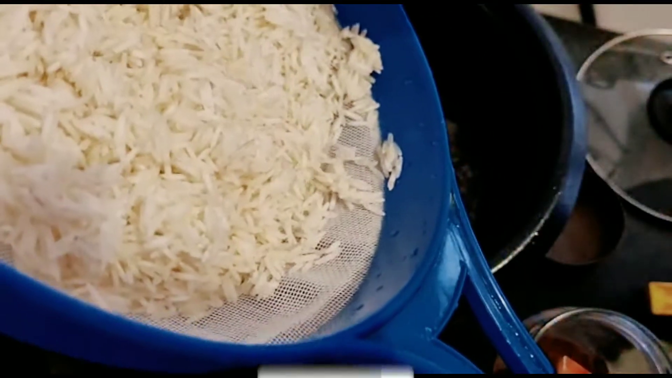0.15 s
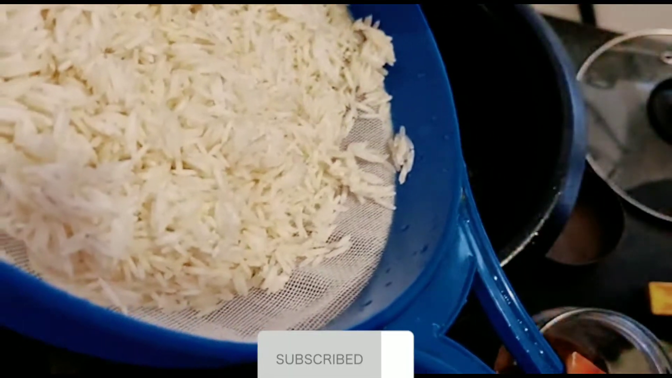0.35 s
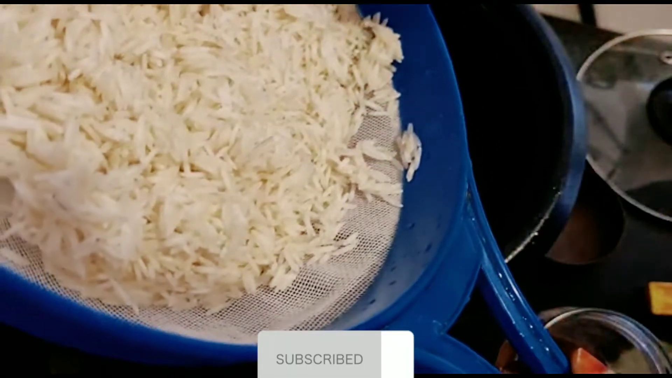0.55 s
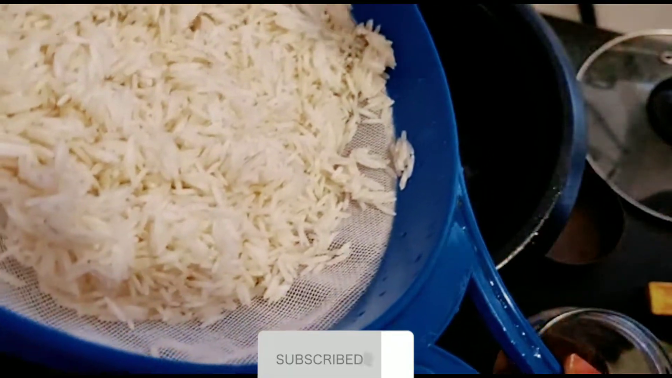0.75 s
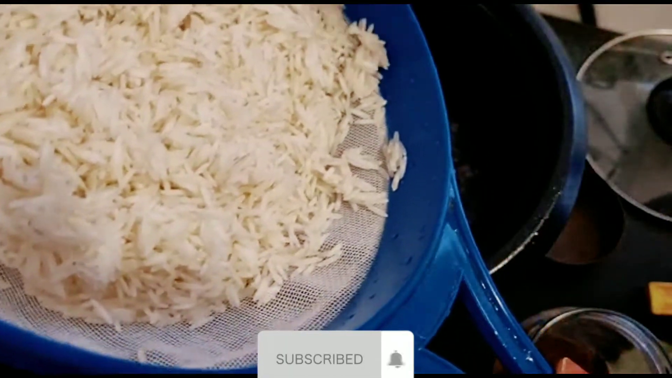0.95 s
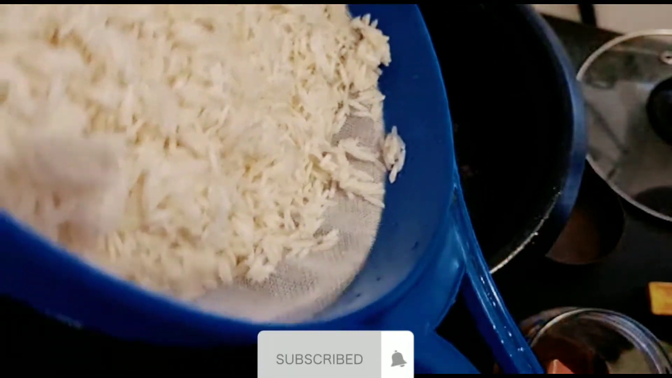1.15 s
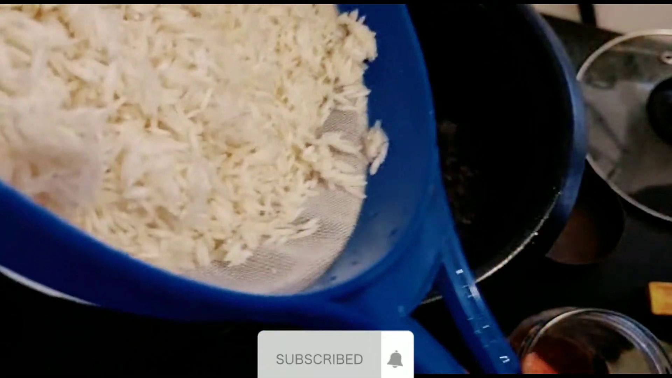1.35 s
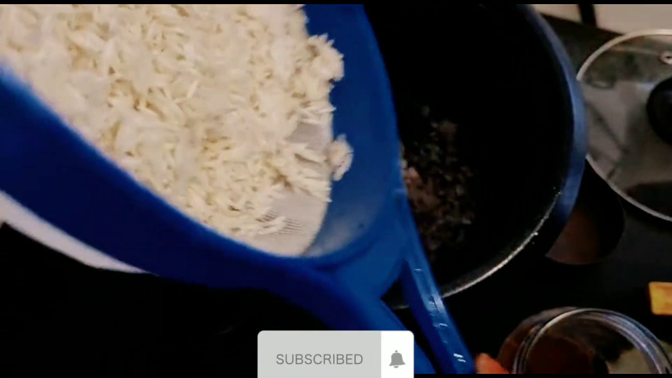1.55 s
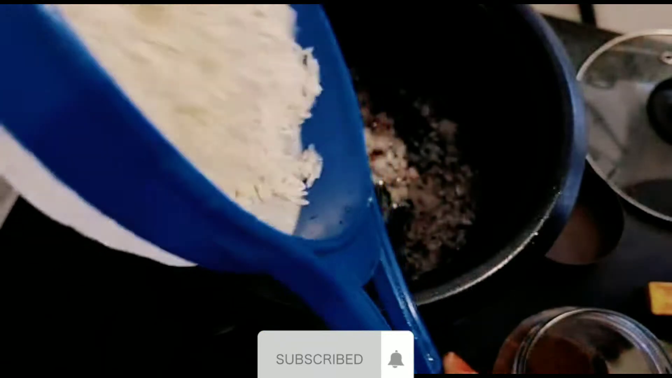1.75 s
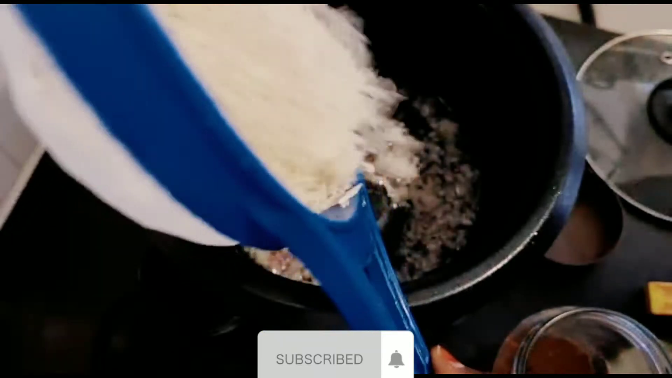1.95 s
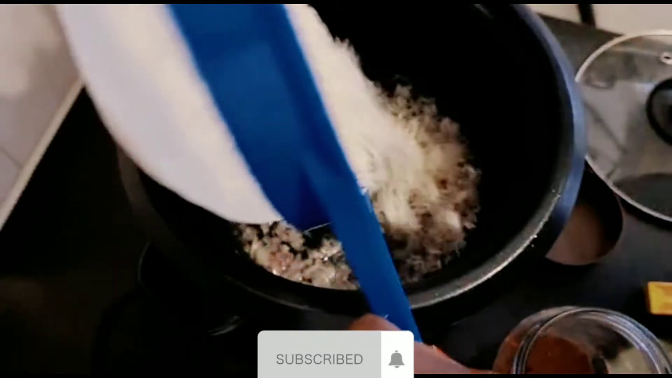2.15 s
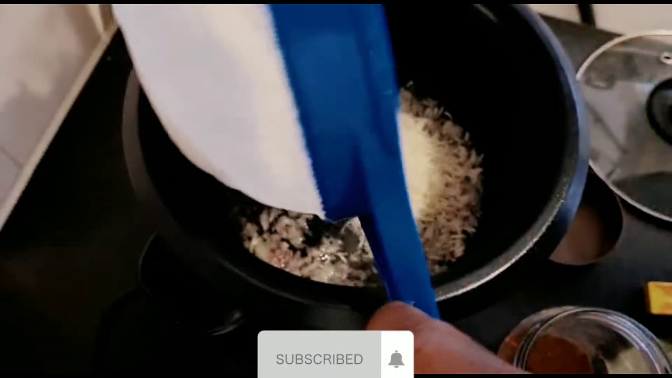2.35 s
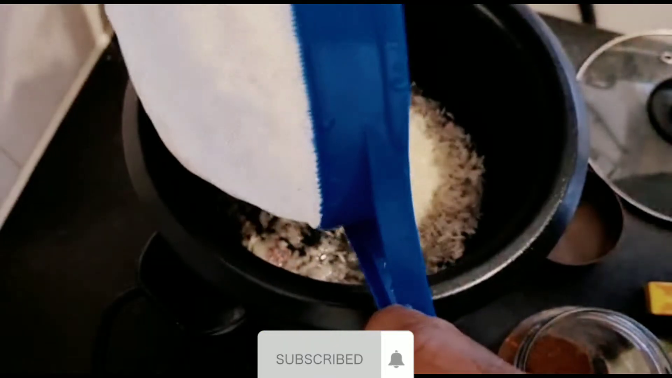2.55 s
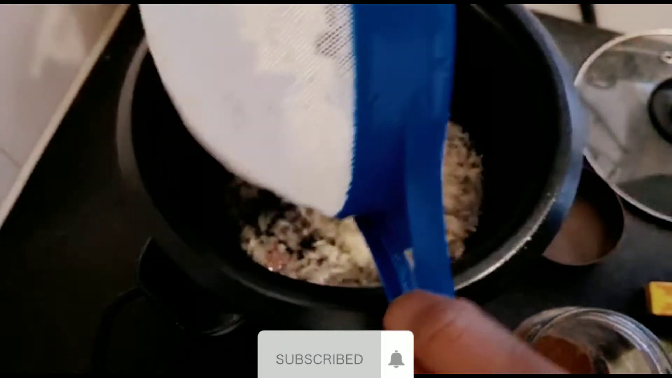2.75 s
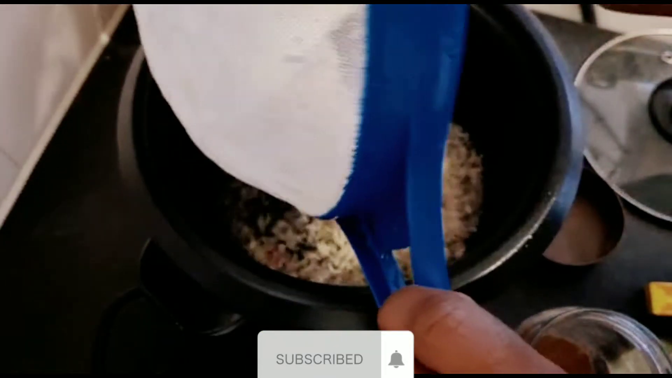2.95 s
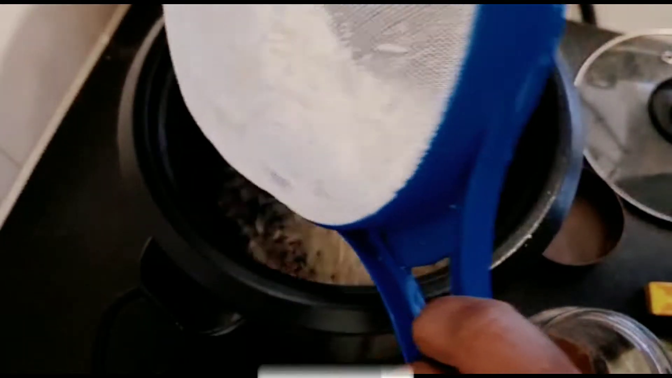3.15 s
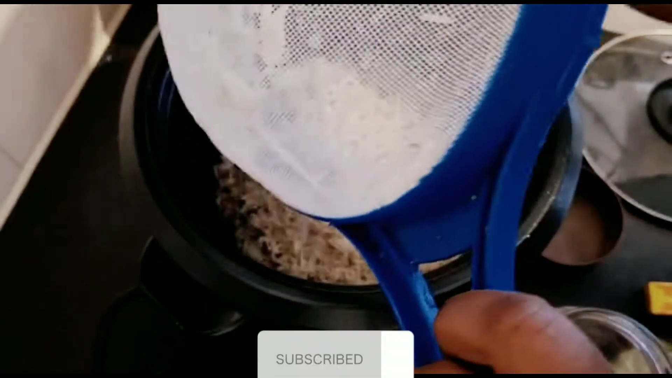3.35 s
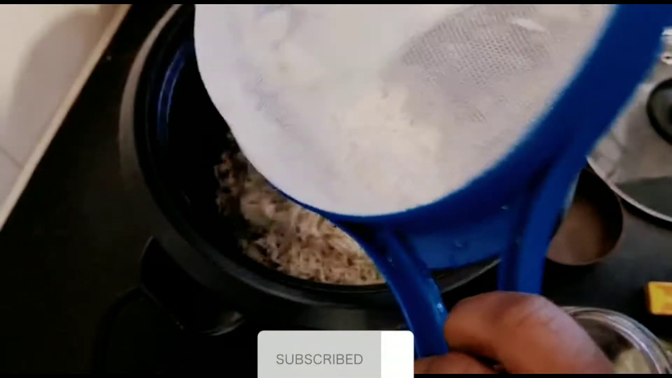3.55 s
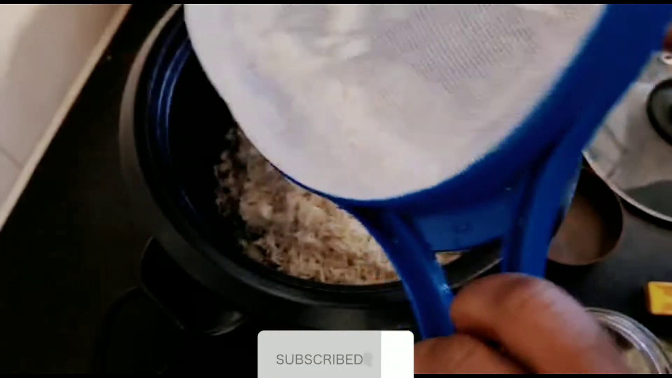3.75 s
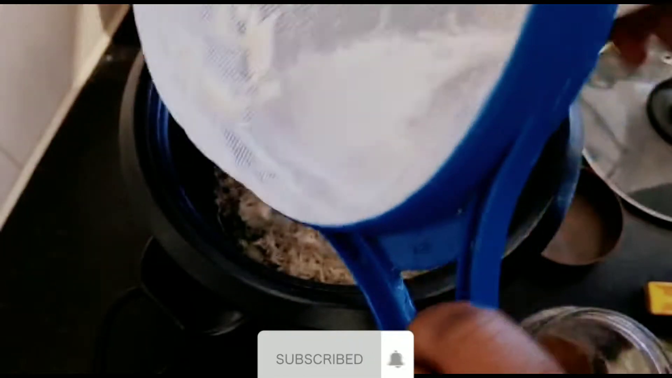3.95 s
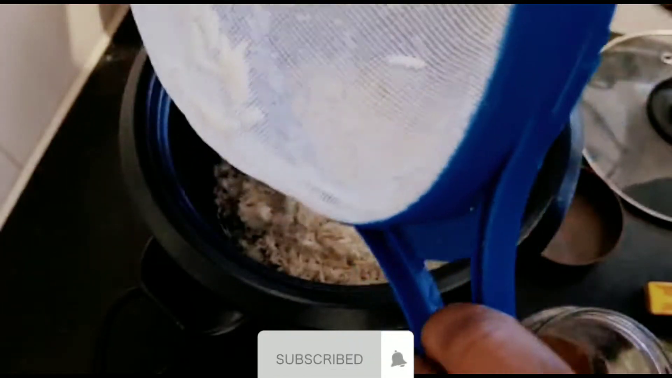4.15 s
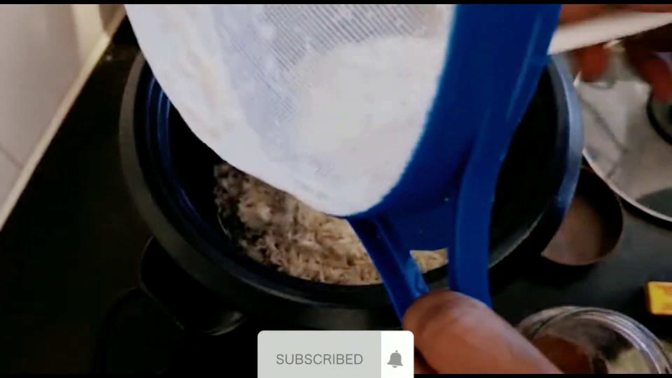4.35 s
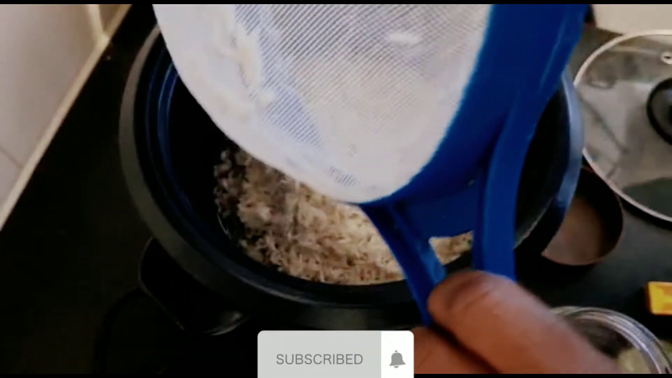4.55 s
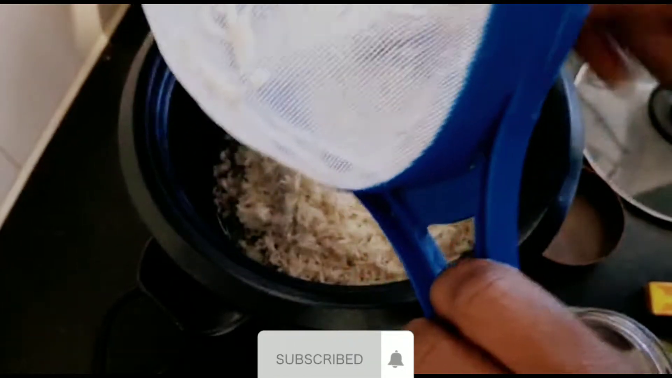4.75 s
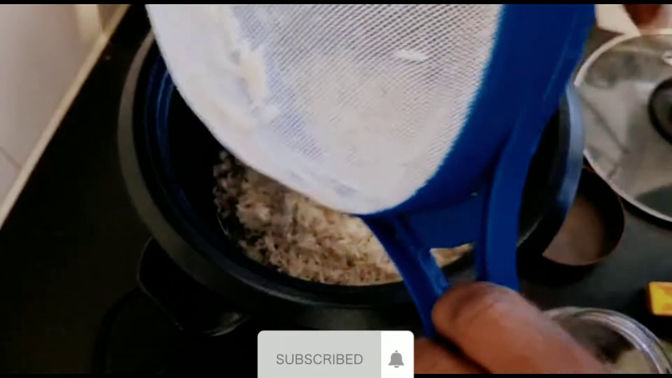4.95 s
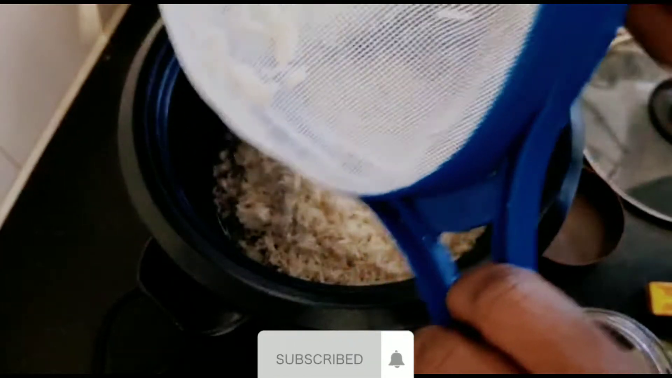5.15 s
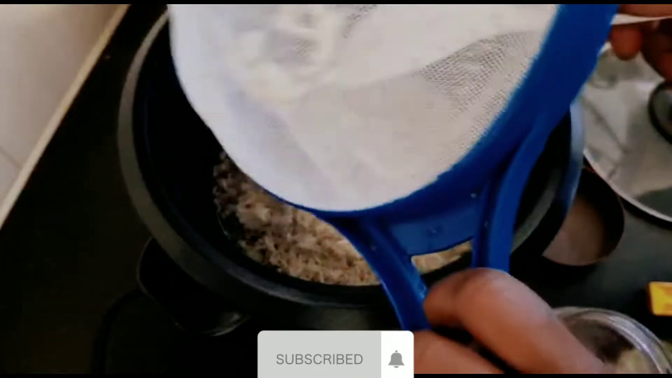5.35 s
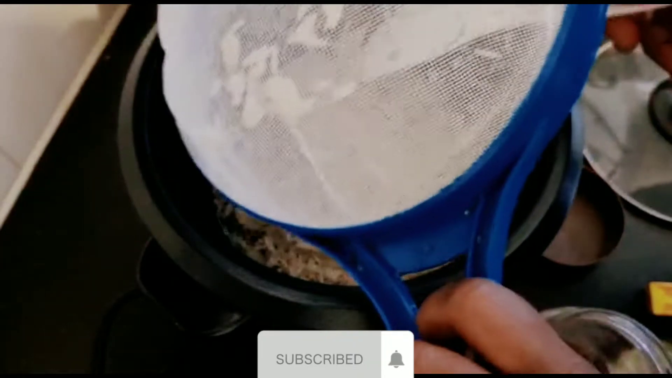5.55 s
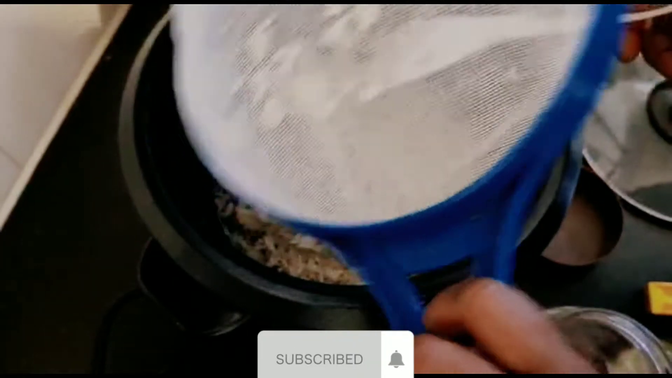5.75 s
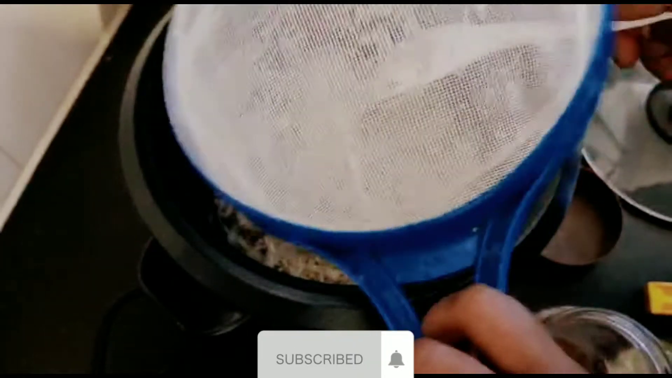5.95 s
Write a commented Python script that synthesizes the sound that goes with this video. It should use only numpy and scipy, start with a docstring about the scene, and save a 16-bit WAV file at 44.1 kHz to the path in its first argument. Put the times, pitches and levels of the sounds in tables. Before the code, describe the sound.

Wet rice pours hissing into a hollow pot with heavy strainer knocks, then fingers scrape and flick the mesh before three taps on the rim.

```python
"""Rice poured from a mesh strainer

Rice slides out of a plastic mesh strainer into a pot on a stove in a small kitchen. Grains rush as bunched
impacts and drum on the resonant pot; clumps land and the frame knocks the pot, as decaying modes. Each clump
also thumps the stove low. Fingers flick the frame, with one soft thud (noise bursts), and rub the mesh (impacts
through its resonances) to free the last grains, then come three firm taps on the rim. A low hum of resonated
noise goes on underneath."""
import sys
import numpy as np
from scipy import signal
from scipy.fft import rfft, irfft
from scipy.io import wavfile
from scipy.ndimage import uniform_filter1d

SR = 44100
rng = np.random.default_rng(int(sys.argv[2]) if len(sys.argv) > 2 else 0)


def inscribe(sig):
    """Save sig as 16-bit PCM at rate SR to the path in sys.argv[1].

    A 1-D sig is mono; a 2-D sig holds one channel per row.
    Samples are clipped to [-1, 1] before scaling.
    """
    pcm = np.round(np.clip(np.atleast_2d(sig).T, -1, 1) * 32767)
    wavfile.write(sys.argv[1], SR, pcm.astype(np.int16))


N = 264644
T = np.arange(N) / SR
RING = T[:SR]  # time axis of a single blow, one second long

# All levels in the tables are relative; the functions set the balance between the parts of a sound.
# flow of rice over the lip of the strainer: start_s, level_db
FLOW = [(1.66, -59.5), (1.735, -33), (1.782, -38.5), (1.81, -27), (1.899, -25.5), (1.99, -35),
        (2.049, -24.5), (2.14, -24), (2.221, -27), (2.3, -34), (2.43, -36.5), (2.48, -31), (2.66, -36.5),
        (2.86, -39.5), (2.93, -31), (3.08, -38.3), (3.27, -36.5), (3.34, -50)]
# the first grains drop at FALL_S; the full stream finds the bare pot floor at LAND_S
FALL_S, LAND_S, LAND_DB_PER_S = 1.80, 2.046, 173
# the growing bed of rice muffles the floor quickly, the wall slowly
FLOOR_MUFFLE_DB_PER_S, WALL_MUFFLE_DB_PER_S = 19, 12
# grains cushion each other, so the drumming grows only as this power of the flow
CUSHION_POWER = 0.7
# pot floor under the stream: pitch_hz, width_hz, level_db
FLOOR_RESONANCES = [(150, 76, -25.5), (284, 200, -10), (554, 16, -14), (588.7, 36, 1.5), (636, 43, -6),
                    (797, 53, -7.5)]
# pot wall under the stream: pitch_hz, width_hz, level_db
WALL_RESONANCES = [(1372, 54, 2.5), (1479, 31, -2.5), (1550, 99, -12), (2085, 77, -4)]

# the load slips as a whole when the first grains drop: start_s, hold_s, t60_s, level_db
SLIP = (1.82, 0.15, 0.1, -26)
# layers of grains peel off the mesh: start_s, hold_s, t60_s, level_db
PEELS = [(2.92, 0.097, .2, -34.5), (3.048, 0.2, 0.11, -27), (3.428, 0.042, 0.52, -39),
         (5.516, .015, 0.23, -32.5), (5.966, 0.0071, 0.23, -33)]
# spurts of grains spring off the mesh: start_s, burst_db, brush_db
SPURTS = [(1.7324, -34, -30), (1.7987, -38, -18.5), (1.8268, -13.5, -25), (2.0428, -7.5, -28),
          (2.1399, -8.5, -16.5), (2.182, -10.5, -39), (2.693, -13, -39), (2.8948, -14, -45),
          (3.002, -12, -52), (3.0487, -9.5, -24), (3.0963, -9.5, -41.5), (3.1313, -7, -40),
          (3.1512, -11, -43), (3.1738, -5, -27.5), (3.1865, -3.5, -43), (3.231, -10, -39),
          (3.271, -13.5, -45), (3.4259, -19.5, -22.5), (3.4398, -16.5, -21), (3.5566, -22.5, -23.5),
          (3.6704, -16, -51), (3.807, -16.5, -10), (3.995, -17.5, -57), (4.0854, -34, -26.5),
          (5.5148, -16.5, -27.5)]
SPURT_T60_S, SPURT_PAN_DB = 0.079, 2.5  # pan: left minus right, shared with the peeling

# fingers rub the mesh: start_s, hold_s, t60_s, rubbing_db, loosened_grains_db, frame_flex_db
STROKES = [(3.385, 0.0087, 0.57, -31.5, -36.5, -32.5), (3.682, 0.016, 0.1, -44.5, -49, -42),
           (3.808, 0.042, 0.38, -28, -40, -24.5), (4.202, 0.075, 0.33, -32, -44.5, -33),
           (4.602, .1, 0.19, -32.5, -47.5, -34), (4.759, 0.021, 0.12, -37.5, -50, -45.5),
           (5.097, 0.026, 0.084, -29, -44, -25.5), (5.173, 0.0085, 0.059, -38.5, -64, -31)]
# a push builds up at this rate; the frame relaxes in this share of the time that the mesh takes
PRESS_DB_PER_S, FLEX_SHARE = 479, 0.33
# resonances of the taut mesh and its frame: pitch_hz, width_hz, level_db
MESH_RESONANCES = [(622, 26.1, -5), (1120, 63, -9.5), (1210, 230, -11.5), (1906, 330, -9.5),
                   (2443, 99, -1.5), (2668, 74, 5), (2870, 134, -2.5), (3140, 53, 0), (3760, 120, -5),
                   (4250, 120, -2.5), (5000, 300, -12)]
# fingernail flicks and a soft thud (the first row) on the frame: start_s, level_db, t60_s
FLICKS = [(3.793, -22.5, 0.1), (3.8444, -2, 0.021), (4.117, -13, 0.03), (4.546, -5.5, 0.015),
          (4.685, -17.5, 0.057), (5.021, -11.5, 0.018), (5.085, -22, 0.067), (5.111, -10.5, 0.033),
          (5.114, -14, 0.02)]

# the strainer hits the pot: start_s, frame_db, contact_corner_hz, stove_thump_db, crack_db, pot_ring_db,
# place (0 wall to 1 rim), ring_length (factor on the decay of frame, chatter and stove)
KNOCKS = [(2.585, -1.5, 1214, -44, -20, -20, 0, 0.51), (2.959, 4, 425, -35, -16, -43, 0.078, 0.37),
          (2.969, 2.5, 199, 0, -41, -62, 0, 0.47), (5.382, -8, 1170, -18.5, -12, -34, 0.98, 0.95),
          (5.627, -9, 1410, -20, -12.5, -35, 0.9, 0.91), (5.876, -7, 1100, -15, -10.5, -32.5, 0.61, 0.77),
          (5.890, -7, 480, -5.5, -22, -29, 0.93, 0.84)]
# modes of the strainer frame, t60 before the ring_length factor: pitch_hz, level_db, t60_s
FRAME_MODES = [(239, -20, 0.2), (291, -5, 0.094), (335.7, -6, 0.19), (407, -5.5, 0.08), (521, 2, 0.074),
               (580.4, -8.5, 0.13), (631, 5, 0.032), (766, -7, 0.012), (996, -18.5, .1), (1277, -16, 0.11)]
# modes of the pot wall: pitch_hz, wall_struck_db, rim_struck_db, t60_s
POT_MODES = [(917, -6, -22, 0.3), (1263, -19.5, 2, 0.21), (1357, -1, -12, .7), (1519, -6, 2.5, 0.33),
             (1543.4, -3.5, -2.5, 0.75), (2090, -12.5, -12, 0.41), (2200, -15, -24, 0.25),
             (2363, -7.5, -15, 0.49), (3280, -20, -11.5, 0.75), (3700, -20.5, 4, 0.27),
             (4840, -20.5, -14, .15), (4728, -12, 4.5, 0.15), (6040, -26.5, -4.5, 0.29)]
# modes of the stove, t60 before a length factor: pitch_hz, level_db, t60_s
STOVE_MODES = [(57, -18, .3), (104, 0, .27), (122, -8, .15), (138, -8, .14), (172, -7, .16)]
# clumps of rice land on the pot floor and thump the stove: # start_s, floor_db, stove_thump_db
CLUMPS = [(2.305, -16.5, -24), (2.333, -25.5, -22), (2.440, -26, -26), (2.459, -14.5, -18),
          (2.488, -12.5, -20.5), (2.501, -13.5, -33.5), (2.508, -25, -13), (2.722, -28.5, -25),
          (3.004, -20.5, -17.5), (4.221, -26, -61), (4.252, -27, -58.5)]
# modes of the loaded pot floor: pitch_hz, level_db, t60_s
FLOOR_MODES = [(172, -3, 0.062), (258.6, 2, 0.098), (292.7, -1.5, .11), (536, -3, 0.043), (633.6, 1, 0.089),
               (741, -12, 0.089), (1184, -10.5, .06)]

# the hand shifts its grip: start_s, level_db
GRIPS = [(.04, -53.5), (.068, -56), (1.158, -58), (4.492, -43.5), (5.596, -42)]
# the load settles at first; later the hand keeps turning the empty strainer
SETTLE_DB, SETTLE_DB_PER_S, TURN_S, TURN_DB = -60, 30, 5.0, -55

# spectrum of grains pattering on each other: pitch_hz, level_db
PATTER_SPECTRUM = [(900, -13), (2500, 3), (4500, -1), (5200, 1.5), (7400, -3.5), (8600, 4), (10500, -0.5),
                   (14500, 0), (16000, -12.5)]
# spectrum of grains sliding over the mesh: pitch_hz, level_db
SLIDE_SPECTRUM = [(500, -26), (1100, -31), (2000, -7.5), (2900, 4), (4000, -1.5), (6000, -6),
                  (10000, -18.5)]
# spectrum of grains springing off the mesh: pitch_hz, level_db
SPURT_SPECTRUM = [(3000, -33), (5500, -12.5), (7400, -7.5), (8700, 3.5), (10800, -3.5), (13000, 1),
                  (15000, -3.5), (16500, -11)]
# spectrum of threads catching: pitch_hz, level_db
RUBBING_SPECTRUM = [(800, -40.5), (1500, -16), (2100, 3), (2900, 9), (4500, 2), (6300, -3), (7600, -5.5),
                    (14000, -44)]
# spectrum of the flexing frame: pitch_hz, level_db
FLEX_SPECTRUM = [(150, -18.5), (330, -6), (480, -4.5), (650, 2), (900, -2), (1200, -3.5), (1700, -1.5),
                 (3000, -43)]
# spectrum of flicks and a soft thud on the frame, also of a clump's scatter: pitch_hz, level_db
FLICK_SPECTRUM = [(150, -15), (400, -10), (650, 0), (1300, -10), (3100, 4.5), (4500, -9.5), (5800, -7.5),
                  (7500, -18), (9000, -14), (15000, -31.5)]
# spectrum of the contact tick and grain rattle of a knock: pitch_hz, level_db
CRACK_SPECTRUM = [(300, -7), (800, 7), (1500, -2.5), (2500, -1), (5000, -4), (7400, -10.5), (8800, 2),
                  (11000, -6.5), (15000, -11)]
# spectrum of the loose pan support chattering under a blow: pitch_hz, level_db
CHATTER_SPECTRUM = [(85, -15), (125, 0.5), (200, 3), (340, 11), (440, -9), (560, -9), (800, -23),
                    (1600, -16), (4000, -53.5)]

# echoes from the pot, worktop and tiles: left_delay_s, right_delay_s, level_db
ECHOES = [(.0013, .0017, -9), (.0031, .0026, -9), (.0052, .0058, -11), (.0083, .0074, -13)]
# small surfaces reflect mainly short waves: pitch_hz, level_db
ECHO_SPECTRUM = [(700, -9), (1800, -6.5), (6000, -4), (15000, -5.5)]
# reverberation time of the room: pitch_hz, t60_s
ROOM_T60 = [(200, 0.5), (1500, 0.29), (5000, 0.4), (12000, 0.42)]
# spectrum of the room's answer: pitch_hz, level_db
ROOM_SPECTRUM = [(100, -2), (350, -4.5), (1500, -3), (6000, -1.5), (14000, -5.5)]
# spectrum of the soft air noise: pitch_hz, level_db
AIR_SPECTRUM = [(15, -75), (25, -29), (53, -9.5), (74, -5.5), (137, -6), (212, -26), (270, -23), (373, -30),
                (405, -20.5), (624, -37), (840, -31.5), (1070, -42.5), (2410, -40), (4610, -55.5),
                (16000, -52.5)]
AIR_DB, HUM_DB = -46.5, -46.5
# hum of the stove and fan: pitch_hz, width_hz, level_db
HUM_RESONANCES = [(83.3, 8, 0), (133.5, 7, 0.5), (155.3, 8, -3), (274.4, 10, -16), (404, 26, -14.5)]
# difference between the two microphones: pitch_hz, side_minus_mid_db
WIDTH = [(60, -17), (170, -15), (380, -0.5), (700, -1.5), (1290, 4), (2400, 1), (15000, -0.5)]
TOP_HZ = 15600


def pour():
    """Granular flow: one flow drives sliding, patter and drumming, until the bed of rice damps the pot."""
    s, db = np.transpose(FLOW)
    flow = undb(np.interp(T, s, db)) * swell(s[0], s[-1] - s[0], t60=0.35)
    dropping = flow * swell(FALL_S, s[-1] - FALL_S, t60=0.3)
    early_db = LAND_DB_PER_S * np.minimum(T - LAND_S, 0)
    bed_s = np.maximum(T - LAND_S, 0)
    # the constant terms are stray grains that reach the pot at any time
    on_floor = undb(early_db - FLOOR_MUFFLE_DB_PER_S * bed_s) + undb(-30)
    on_wall = undb(early_db - WALL_MUFFLE_DB_PER_S * bed_s) + undb(-8.5)

    falling = tint(grains(rate=3500, scatter_db=3.0, bunch_rate=150, bunch_db=2.5), PATTER_SPECTRUM)
    sliding = tint(grains(rate=2500, scatter_db=3.0, bunch_rate=81, bunch_db=2.0), SLIDE_SPECTRUM)
    landing = grains(rate=1200, scatter_db=4, bunch_rate=56, bunch_db=3.0)
    drumming = undb(-3.5) * on_floor * resonate(landing, FLOOR_RESONANCES)
    drumming = drumming + undb(-12.5) * on_wall * resonate(landing, WALL_RESONANCES)

    slide = undb(-4.0) * flow * sliding
    patter = dropping * (undb(-2.5) + undb(early_db - 11.5)) * falling
    return slide + patter + dropping ** CUSHION_POWER * drumming


def slipping():
    """Static friction gives way: the load breaks loose and rasps across the threads of the mesh."""
    s, hold, t60, db = SLIP
    catches = grains(rate=1800, scatter_db=2.0, bunch_rate=100, bunch_db=0.5)
    rasp = tint(catches, RUBBING_SPECTRUM) + undb(-12) * resonate(catches, MESH_RESONANCES)
    return undb(db) * swell(s, hold, t60) * rasp


def peeling():
    """Loss of adhesion: layers of grains let go of the mesh in a crisp, uneven crackle."""
    crackle = tint(grains(rate=4000, scatter_db=3.0, bunch_rate=53, bunch_db=5.0), SPURT_SPECTRUM)
    release = sum(undb(db) * swell(s, hold, t60) for s, hold, t60, db in PEELS)
    return pan(release * crackle, db=SPURT_PAN_DB)


def spurts():
    """Sudden release: a pinch of grains lets go in a crisp burst with a duller brush of the mesh."""
    out = np.zeros((2, N))
    for s, burst_db, brush_db in SPURTS:
        burst = undb(burst_db - 6.0) * noise(SPURT_SPECTRUM, size=SR)
        brush = undb(brush_db - 3.5) * noise(SLIDE_SPECTRUM, size=SR)
        add(out, s - 0.001, (burst + brush) * fade(SPURT_T60_S, rise=0.00079))
    return pan(out, db=SPURT_PAN_DB)


def rubbing():
    """Stick and slip: fingers catch on threads and ring the mesh; the frame flexes and grains come loose."""
    rub = loose = flex = 0
    for s, hold, t60, rub_db, loose_db, flex_db in STROKES:
        push = swell(s, hold, t60)
        rub = rub + undb(rub_db) * push
        loose = loose + undb(loose_db) * push
        flex = flex + undb(flex_db) * swell(s, hold, t60 * FLEX_SHARE)
    catches = grains(rate=800, scatter_db=2.5, bunch_rate=87, bunch_db=2.0)
    crumbs = grains(rate=1500, scatter_db=1.5, bunch_rate=250, bunch_db=2.5)
    rasp = undb(-1.0) * tint(catches, RUBBING_SPECTRUM) + undb(-5.5) * resonate(catches, MESH_RESONANCES)
    flexing = undb(-2.5) * flex * tint(catches, FLEX_SPECTRUM)
    loosened = undb(2.0) * loose * tint(crumbs, PATTER_SPECTRUM)
    return rub * rasp + flexing + loosened


def flicks():
    """Impulsive excitation: fingernail flicks and a soft thud on the frame, as bursts with a faint tail."""
    out = np.zeros((2, N))
    for s, db, t60 in FLICKS:
        contact = fade(t60, rise=0.00028)
        rustle = undb(-16.0) * fade(0.1, rise=0.0045)
        add(out, s, undb(db - 2.5) * noise(FLICK_SPECTRUM, size=SR) * (contact + rustle))
    return out


def knocks():
    """Modal impact: the strainer strikes the pot, frame and wall ring, the stove thumps and chatters."""
    out = np.zeros((2, N))
    for s, frame_db, corner_hz, thump_db, crack_db, ring_db, place, length in KNOCKS:
        # a soft contact weakens the modes above its corner; a firm grip shortens them
        frame_modes = [(hz, db - 10 * np.log10(1 + (hz / corner_hz) ** 4), t60 * length)
                       for hz, db, t60 in FRAME_MODES]
        frame = ring(frame_modes, rise=0.0008)
        chatter = undb(-11.5) * noise(CHATTER_SPECTRUM, size=SR) * fade(0.26 * length, rise=0.0034)
        # on the rim the frame stays in touch and roughens the ring; the wall rings freely
        pot_modes = [(hz, np.interp(place, [0, 1], [wall, rim]), t60) for hz, wall, rim, t60 in POT_MODES]
        pot = ring(pot_modes, rise=0.00054) * undb(2.5 * place * walk(70)[:SR])
        # a sharp tick of contact, then the grains left in the mesh rattle on unevenly
        tick = undb(6.0) * fade(0.018, rise=0.001)
        rattle = undb(-10 + 4.3 * walk(160)[:SR]) * fade(0.21, rise=0.0031)
        crack = noise(CRACK_SPECTRUM, size=SR) * (tick + rattle)
        blow = undb(frame_db) * (frame + chatter) + undb(ring_db) * pot
        add(out, s, blow + undb(crack_db) * crack + undb(thump_db) * thump(length))
    return pan(out, db=0.5)


def clumps():
    """Inelastic impact: clumps of rice land on the pot floor, each with a low thump of the stove."""
    out = np.zeros((2, N))
    floor, stove = ring(FLOOR_MODES, rise=0.0027), thump(length=0.91)
    for s, floor_db, thump_db in CLUMPS:
        # a short scatter of grains goes with the ring of the floor
        scatter = undb(-9.0) * noise(FLICK_SPECTRUM, size=SR) * fade(0.052, rise=0.00057)
        add(out, s, undb(floor_db) * (floor + scatter) + undb(thump_db) * stove)
    return out


def thump(length):
    """Inertia: the heavy stove takes up a blow slowly and radiates weakly below its lowest mode."""
    swing = ring([(hz, db, t60 * length) for hz, db, t60 in STOVE_MODES], rise=0.0069)
    return signal.sosfilt(signal.butter(2, 48, "high", fs=SR, output="sos"), swing)


def handling():
    """Light friction: mesh and frame rustle and creak faintly in the hand, more at each shift of grip."""
    level = undb(SETTLE_DB - SETTLE_DB_PER_S * T) + undb(TURN_DB) * swell(TURN_S, hold=1, t60=0.3)
    shifts = np.zeros((1, N))
    for s, db in GRIPS:
        add(shifts, s, undb(db) * fade(t60=0.19, rise=0.0024))
    catches = grains(rate=2300, scatter_db=2.5, bunch_rate=60, bunch_db=4.0)
    rustle = undb(-1.5) * tint(catches, SLIDE_SPECTRUM) + undb(-10.5) * tint(catches, PATTER_SPECTRUM)
    creak = undb(-0.5) * tint(catches, FLEX_SPECTRUM)
    return (level + shifts) * (rustle + creak)


def echoes(dry):
    """Early reflection: delayed copies from hard surfaces comb the treble differently left and right."""
    out, bright = np.zeros((2, N)), colour(dry, ECHO_SPECTRUM)
    for left_s, right_s, db in ECHOES:
        add(out[:1], left_s, undb(db) * bright[0])
        add(out[1:], right_s, undb(db) * bright[1])
    return out


def room(dry):
    """Reverberation: tiles and worktop answer with a dense tail whose decay time depends on frequency."""
    tail, hz = noise(ROOM_SPECTRUM, size=SR), np.transpose(ROOM_T60)[0]
    spectrum, f = rfft(tail), np.fft.rfftfreq(SR, 1 / SR)
    answer = 0
    # overlapping bands, each with its own decay
    for share, (_, t60) in zip(np.eye(len(hz)), ROOM_T60):
        answer = answer + irfft(spectrum * np.interp(f, hz, share), SR) * fade(t60, rise=0.0029)
    return signal.fftconvolve(dry, answer / np.sqrt(np.sum(answer ** 2) / 2), axes=1)[:, :N]


def kitchen():
    """Resonated noise: a wavering low hum over soft air noise."""
    hum = resonate(stereo(rng.standard_normal((2, N))), HUM_RESONANCES)
    air = noise(AIR_SPECTRUM, size=N) * undb(0.44 * walk(1))
    return undb(AIR_DB) * air + undb(HUM_DB) * hum


def grains(rate, scatter_db, bunch_rate, bunch_db):
    """Shot noise: tiny impacts, rate per second on average, of uneven size and in bunches."""
    hit = rng.random((2, N)) < rate / SR
    size = undb(scatter_db * np.minimum(rng.exponential(size=(2, N)), 4))
    sign = rng.choice([-1, 1], (2, N))
    return unit(stereo(hit * size * sign) * undb(bunch_db * walk(bunch_rate)))


def ring(modes, rise):
    """Modal superposition: decaying sines with a phase skew between the microphones set by WIDTH."""
    out = 0
    for k, (hz, db, t60) in enumerate(modes):
        side_share = undb(np.interp(hz, *np.transpose(WIDTH)))
        skew = (-1) ** k * np.arctan(side_share) * np.array([[1], [-1]])
        out = out + undb(db) * fade(t60, rise) * np.sin(2 * np.pi * hz * RING + skew)
    return out


def resonate(x, peaks):
    """Parallel resonance: each peak is filtered twice for steep flanks (each pass is 2 widths wide)."""
    out = 0
    for hz, width, db in peaks:
        b, a = signal.iirpeak(hz, hz / width / 2, fs=SR)
        once = signal.lfilter(b, a, x)
        out = out + undb(db) * unit(signal.lfilter(b, a, once))
    return unit(out)


def swell(s, hold, t60):
    """Envelope of a push: it builds up to time s, holds, then decays by 60 dB in t60."""
    build = undb(PRESS_DB_PER_S * np.minimum(T - s, 0))
    return build * np.exp(-np.log(1000) * np.maximum(T - s - hold, 0) / max(t60, 1e-3))


def fade(t60, rise):
    """Exponential damping: a quick rise, then a decay of 60 dB in t60."""
    return (1 - np.exp(-RING / max(rise, 1e-5))) * np.exp(-np.log(1000) * RING / max(t60, 1e-3))


def walk(rate):
    """Random modulation: levels held 1 / rate s and slewed; spread near 1."""
    k = int(SR / rate)
    steps = np.repeat(rng.standard_normal(N // k + 1), k)
    return 1.2 * uniform_filter1d(steps, k)[:N]


def noise(points, size):
    """Filtered randomness: coloured stereo noise of rms 1."""
    return tint(stereo(rng.standard_normal((2, size))), points)


def stereo(pair):
    """Mid and side: two unrelated signals become left and right, alike in the bass."""
    side = colour(pair[1], WIDTH)
    return np.array([pair[0] + side, pair[0] - side])


def tint(x, points):
    """Spectral shaping at constant power: colour, then scale to rms 1."""
    return unit(colour(x, points))


def colour(x, points):
    """Linear filtering by a spectrum of (Hz, dB) points that falls away below its first point."""
    hz, db = np.transpose(points)
    f = np.fft.rfftfreq(x.shape[-1], 1 / SR) + 1
    gain = undb(np.interp(np.log(f), np.log(hz), db)) * np.minimum(f / hz[0], 1) ** 2
    return irfft(rfft(x) * gain, x.shape[-1])


def pan(x, db):
    """Level difference: make the left louder than the right by db."""
    return x * undb([[db / 2], [-db / 2]])


def add(out, s, sound):
    """Superposition: mix a sound in at time s."""
    i = int(s * SR)
    out[:, i:i + sound.shape[-1]] += sound[..., :N - i]


def undb(db):
    """Decibel scale: amplitude gain of a level in dB."""
    return 10 ** (np.asarray(db) / 20)


def unit(x):
    """Power normalisation: scale to rms 1."""
    return x / np.sqrt(np.mean(x ** 2))


def scene():
    """Superposition of everything at the pot, its echoes and the kitchen around it."""
    rice = pour() + slipping() + peeling() + spurts() + clumps()
    strainer = rubbing() + flicks() + knocks() + handling()
    near = rice + strainer
    return near + echoes(near) + undb(-12.5) * room(near) + kitchen()


def record(dry):
    """Limited range and bandwidth: peaks beyond full scale are clipped and the top is cut at TOP_HZ."""
    low_pass = signal.ellip(10, 0.2, 85, TOP_HZ, fs=SR, output="sos")
    return signal.sosfilt(low_pass, np.clip(dry, -1, 1))


dry = scene()
out = record(dry)
inscribe(out)
```